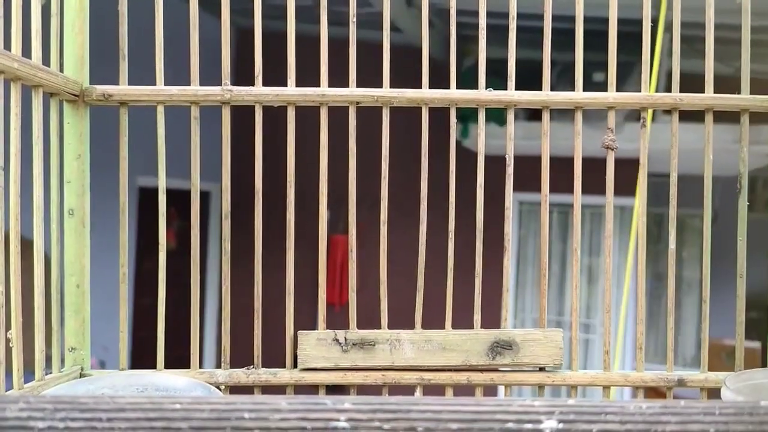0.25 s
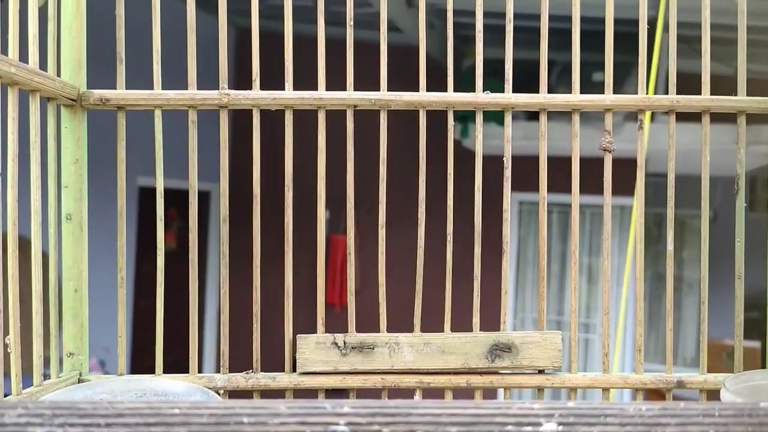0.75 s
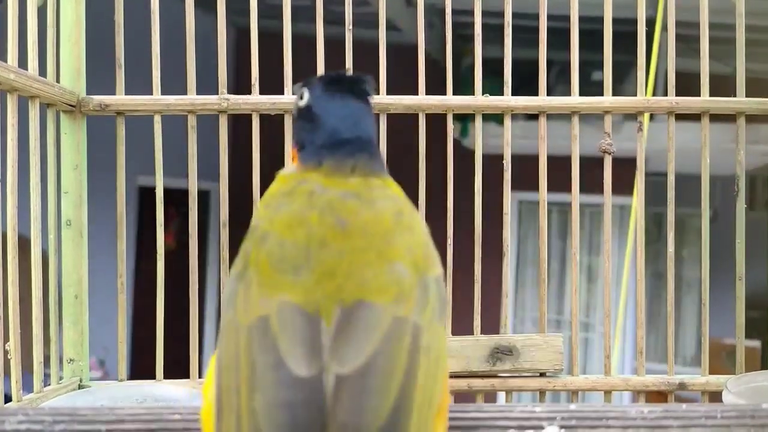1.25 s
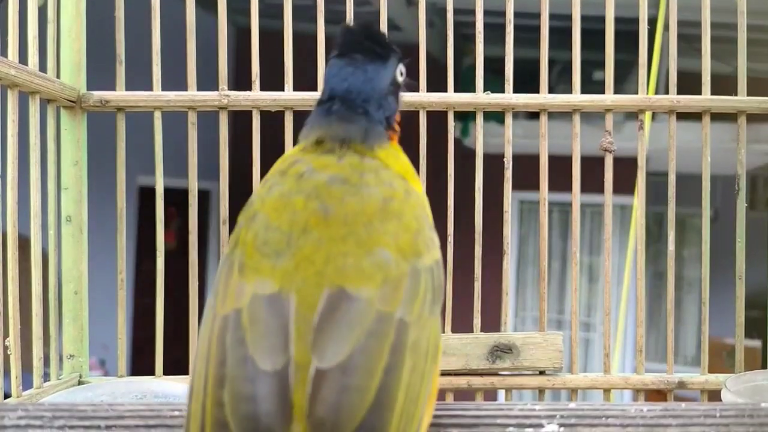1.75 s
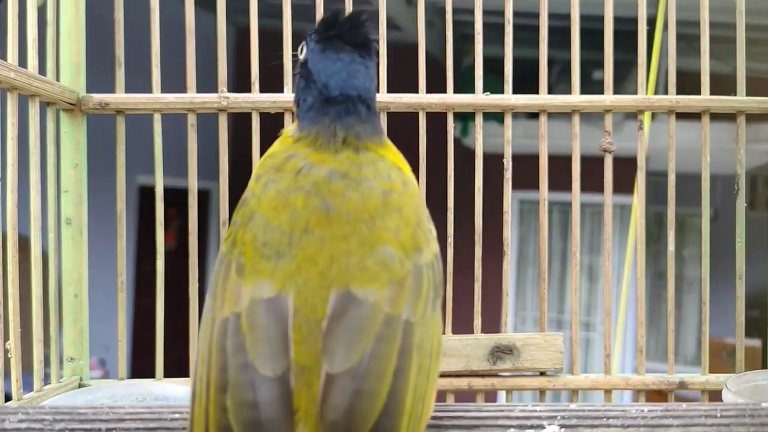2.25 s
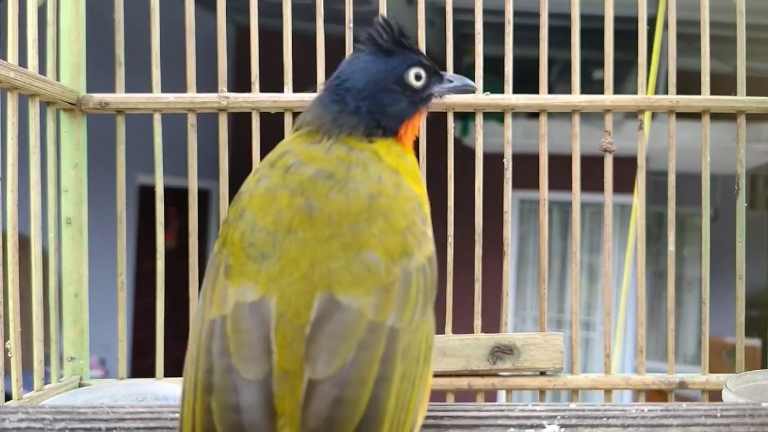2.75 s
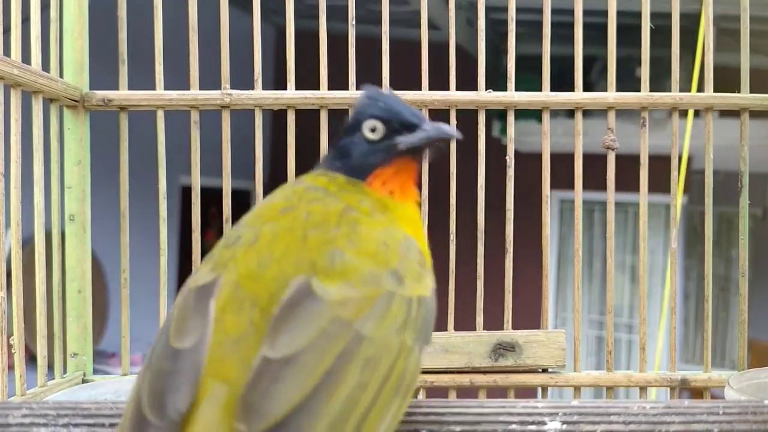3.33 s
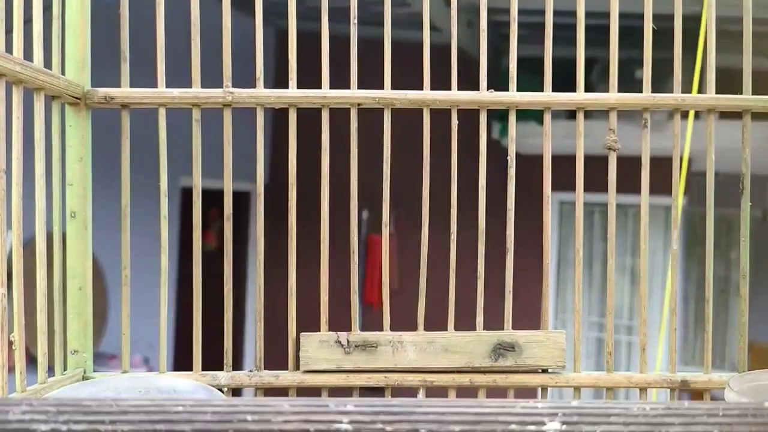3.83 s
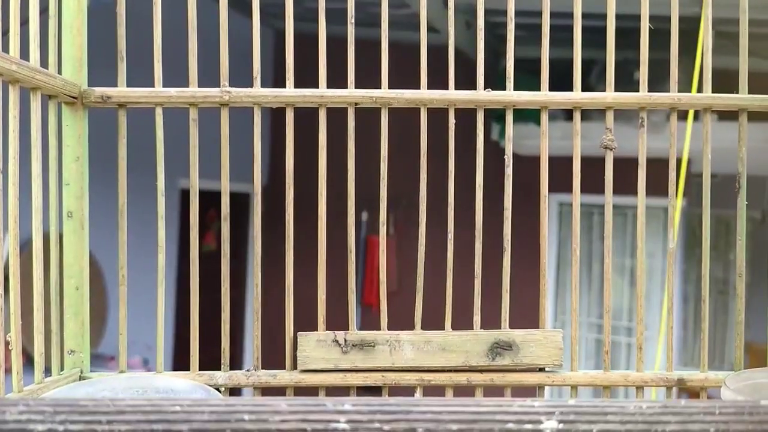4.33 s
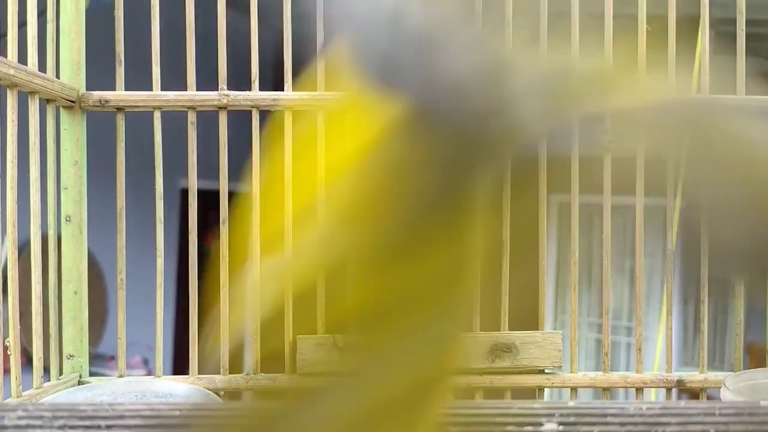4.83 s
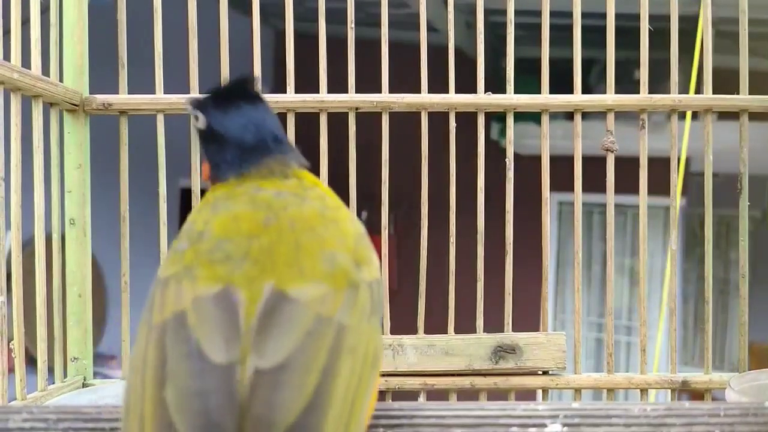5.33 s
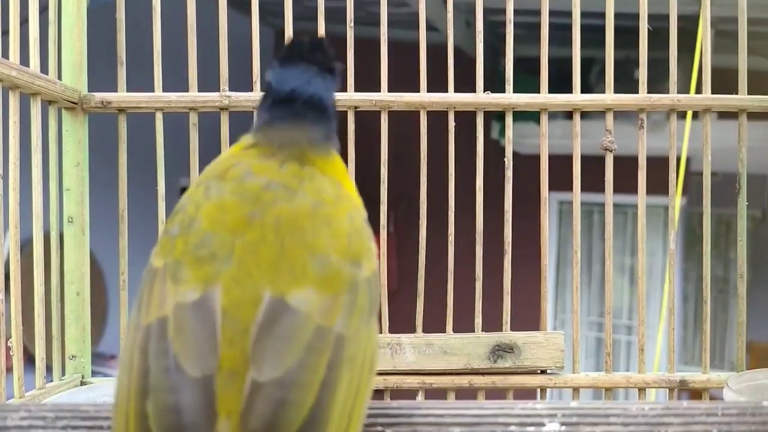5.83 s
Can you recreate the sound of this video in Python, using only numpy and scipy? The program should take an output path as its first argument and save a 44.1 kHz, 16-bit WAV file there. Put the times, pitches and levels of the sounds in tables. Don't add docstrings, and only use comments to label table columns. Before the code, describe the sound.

A phone-like stereo microphone rests on the cage base, so landings jolt low and blunt, mostly on the right, the heaviest overloading. The bird ticks on slats, whistles two quick upsweeps and a clear sustained note, hops away and back, then chatters a swift series of sharp, alternating soft and loud chirps. Behind are flickering, noise-gated yard murmur, house hum and an early far-off crow.

```python
import sys
import numpy as np
from scipy import signal
from scipy.io import wavfile
from scipy.ndimage import uniform_filter1d

SR = 44100
rng = np.random.default_rng(int(sys.argv[2]) if len(sys.argv) > 2 else 0)


def boost_factor(decibels):
    exponent = np.asarray(decibels, float) / 20
    return 10 ** exponent


def store_pcm(level_fs):
    pcm = np.round(np.clip(level_fs, -1, 1) * 32767).astype(np.int16)
    wavfile.write(sys.argv[1], SR, np.atleast_2d(pcm).T)


N = 268480
T = np.arange(N) / SR
YARD_LAG = 17

# time in seconds, gain in dB.
GATE = [(.12, -3.5), (.28, -3), (.68, -0.5), (.92, -11), (1.03, 0), (1.6, -4.5), (2.35, -2), (2.7, -14),
        (3.03, -23.5), (3.065, -12.5), (3.32, -6), (3.43, -29), (3.62, -24.5), (3.665, 1), (4.02, -3),
        (4.66, -34.5), (5.03, -0.5), (5.45, -7.5)]


def band(x, lo_hz, hi_hz, order=3):
    sos = signal.butter(order, [lo_hz, min(hi_hz, .45 * SR)], "band", fs=SR, output="sos")
    return signal.sosfilt(sos, x)


def unit(x):
    return x / np.sqrt(np.mean(x ** 2))


def walk(rate):
    hold = int(SR / rate)
    steps = np.repeat(rng.standard_normal(N // hold + 1), hold)
    return unit(uniform_filter1d(uniform_filter1d(steps, hold), hold)[:N])


def ring(hz, t60, length=.25):
    t = T[:int(length * SR)]
    return np.sin(2 * np.pi * hz * t) * np.exp(-np.log(1000) * t / t60)


def add(out, s, sound):
    i = int(s * SR)
    out[:, i:i + sound.shape[1]] += sound[:, :N - i]


def panned(pan_db):
    return np.array([[pan_db], [-pan_db]]) / 2


def bird():
    # time in seconds, pitch in Hz,
    # level in dB, left minus right in dB, left lag in samples.
    whistles = [
        [(1.6145, 1500, -36, -0.5, 7), (1.619, 2050, -17, -1, 7.7), (1.627, 2190, -7.5, -5, 7.5),
         (1.633, 2950, -6, 8, 6.9), (1.6375, 3380, -3, -6, 4.5), (1.645, 3690, -4.5, -4, 3.4),
         (1.6564, 3570, -3, -5, 3.9), (1.663, 3514, -6.5, -5, 5.5), (1.67, 3530, -25.5, -5.5, 6)],
        [(1.869, 1600, -33, -8, 10), (1.873, 2100, -13, -4, 10), (1.8805, 2170, -8, -8, 9.7),
         (1.8844, 2540, -9, -14, 5.8), (1.8879, 3220, 2.5, -1.2, 9.1), (1.8929, 3630, -1.5, -3, 6.2),
         (1.906, 3840, -3, -3.3, 7.8), (1.9184, 3765, -5.5, 4.5, 5.7), (1.9298, 3730, -23.5, 2, 5.5)],
        [(1.977, 3500, -23, -7.5, 6.4), (1.9915, 3388, -2, -10, 6), (2.0184, 3162, 3.5, -2.5, 8.3),
         (2.045, 3093, 4.5, 1, 7.8), (2.073, 3043, 4, -3.5, 7.25), (2.098, 3088, 4.5, 2.5, 7.9),
         (2.12, 3106, 5.5, -4.5, 7.7), (2.137, 3014, 5.5, 2, 7.1), (2.156, 3040, -6.5, 4.5, 6.8)],
    ]
    # time in seconds, pitch in Hz, level in dB, left minus right in dB, left lag in samples.
    flicks = [
        [(5.438, 2850, -31, -4, 1.1), (5.4415, 2675, -20, -12, 0.95), (5.4475, 2341, -10, -11, 7.6),
         (5.452, 1970, -19, 2, 5.9), (5.457, 1720, -15.5, 2, 1.8), (5.462, 1600, -28.5, 3, 3),
         (5.468, 1550, -16, -6, 1.9)],
        [(5.468, 1707, -27, 5, 2.8), (5.474, 2784, -5.5, -9, 0.67), (5.476, 3220, -6, 8.5, 6.2),
         (5.4795, 3348, 1.3, -3.5, 3.5), (5.4849, 2646, -22, -24, .7), (5.488, 2400, -21, -3, 2)],
        [(5.5, 2100, -13.5, -3.5, 2.3), (5.5025, 2495, -15, -8, 2.7), (5.5065, 3236, -1.5, 6, 5.9),
         (5.51, 3240, 1.26, -4, 2.6), (5.514, 3190, -1.5, -0.5, 5.9), (5.5185, 3150, -8.5, 2, 6.5),
         (5.523, 3120, -34, -3, 4.6)],
    ]
    # time in seconds, pitch in Hz, level in dB, left minus right in dB, left lag in samples.
    warbles = [
        [(5.562, 3400, -40, -8, 2.8), (5.5705, 3700, -21, -5, 2.7), (5.5859, 3972, -14, 1, 2.1),
         (5.598, 3990, -15, -4.5, 2.3), (5.604, 3883, -22.5, 0, 2), (5.609, 3505, -20, -3, 2.1)],
        [(5.648, 3490, -28.5, 1, 2.1), (5.6555, 3388, 2.4, -2.5, 3.4), (5.6639, 3264, 2.5, -2, 3.1),
         (5.678, 3050, -1.5, 11, 5), (5.6914, 3300, 2, -2, 3.4), (5.6975, 4145, -9, 3, 1.7),
         (5.7035, 4620, -1.5, -3, 2.3), (5.7153, 4890, -1, -0.5, 2), (5.7248, 5100, -21.5, -13, 0.96)],
        [(5.782, 3745, -38.5, -4, -3), (5.79, 3830, -21, 0, 1.8), (5.8, 4077, -15, 1, 2),
         (5.8124, 4126, -16, 2, 0.4), (5.8259, 4070, -33.5, -3.5, -0.5)],
        [(5.866, 3439, -23.5, -6, 5.1), (5.8755, 3399, -0.5, -11, 5), (5.9035, 3202, 2.5, -6, 8.5),
         (5.9095, 3280, -2, -12, 8), (5.9125, 3600, 0, -1, 4.2), (5.9175, 4365, -5, -1, 5.8),
         (5.9244, 4746, -1, -3, 6.15), (5.9328, 4884, -3.5, 1.5, 7.3), (5.9438, 5165, -19, -8, 7.9)],
    ]
    # half-pitch line in dB, 1.5 x line in dB, octave line in dB, rasp 0-1.
    voice = [(-33, -30, -39, 0.035), (-36, -31, -29, 0.03), (-38, -46.5, -46, 0.01), (-30, -40, -30, 0.06),
             (-22, -38, -42, 0.09), (-27.5, -40, -50, 0.08), (-27, -40, -22, 0.015),
             (-9, -19, -37.5, 0.055), (-23, -27, -28, 0.04), (-6, -23, -37, 0.05)]
    out = np.zeros((2, N))
    for note, (half_db, fifth_db, octave_db, rasp) in zip(whistles + flicks + warbles, voice):
        s, *columns = np.transpose(note)
        t = np.arange(s[0] - .002, s[-1] + .003, 1 / SR)
        smooth = max(60, len(t) // 24)
        hz, db, lean_db, lag = (uniform_filter1d(np.interp(t, s, c), size=smooth) for c in columns)
        phase = 2 * np.pi * (np.cumsum(hz) - hz * lag * np.array([[1], [0]])) / SR
        height = hz / hz.max()
        breath = unit(band(rng.standard_normal(len(t)), 100, 1400, order=2)) * (hz / 4500) ** 3
        tone = (1 + rasp * breath) * np.sin(phase + rasp * breath)
        odd = np.sin(3 * phase / 2) + 0.15 * np.sin(5 * phase / 2)
        halves = height ** 10 * (boost_factor(half_db) * np.sin(phase / 2) + boost_factor(fifth_db) * odd)
        overtones = boost_factor(octave_db) * height ** 7 * (np.sin(2 * phase) + .2 * np.sin(3 * phase))
        fade = np.clip(np.minimum(t - t[0], t[-1] - t) / .003, 0, 1)
        level = boost_factor(db + np.array([lean_db, -lean_db]) / 2)
        add(out, t[0], (tone + halves + overtones) * fade * level)
    return out


def bounces(x):
    # delay in seconds, left level in dB, right level in dB.
    surfaces = [
        (.0075, -24.5, -22.5),
        (.013, -28, -26.5),
        (.021, -27.5, -27),
    ]
    out = 0
    for s, left_db, right_db in surfaces:
        out = out + np.roll(x, int(s * SR), axis=1) * boost_factor(np.array([[left_db], [right_db]]))
    return out


def porch(x):
    # t60 in seconds, level in dB.
    tails = [
        (0.09, -16.5),
        (.4, -20),
        (.9, -35),
    ]
    t = T[:SR]
    onset = np.clip(t / 0.0027 - .3, 0, 1)
    out, x = [], band(x, 1700, 9500, order=2)
    for _ in range(2):
        tail = 0
        for t60, db in tails:
            fall = boost_factor(-60 * t / t60) * np.sqrt(14 / t60 / SR)
            tail = tail + boost_factor(db) * unit(rng.standard_normal(SR)) * fall
        out.append(signal.fftconvolve(x, tail * onset * np.cos(t * np.pi / 2))[:N])
    return np.array(out)


def cage():
    # start in seconds, peak in dB, pitch in Hz, decay in seconds.
    jolts = [(.001, 2.5, 150, 0.013), (0.011, -11, 100, 0.039), (.036, -14.5, 137, 0.052),
             (0.026, -9, 112, 0.032), (0.045, -12, 115, 0.026), (0.0518, -6, 106, 0.032),
             (0.326, -9.5, 70.2, 0.07), (0.34, -12.5, 90, 0.098), (.352, -6.5, 130, 0.018),
             (0.359, -6.5, 119, 0.026), (0.45, -21, 70, 0.079), (3.643, -30.5, 89, 0.065),
             (3.665, 7, 115.2, 0.036), (3.68, 8.5, 68.4, 0.025), (3.712, -19, 106, 0.066),
             (3.737, -20, 91.5, 0.029), (4.958, -25, 79.3, 0.13), (4.977, -4, 106, 0.031),
             (4.985, 24, 171, 0.017), (4.995, 5.5, 316.6, 0.019), (5.003, 2.5, 348.3, 0.022),
             (4.992, -3, 530, 0.022), (5.0, -12.5, 747, 0.019), (5.006, 9.5, 128, 0.017),
             (5.015, 16, 117, 0.014), (5.024, -8, 151, 0.024), (5.034, 4, 102, 0.017),
             (5.042, -5.5, 90, 0.031), (5.0562, 4.5, 112, 0.0256), (5.066, -13, 121, 0.031),
             (5.079, -17.5, 108, 0.089)]
    # start in seconds, peak in dB, pitch in Hz,
    # decay in seconds.
    thuds = [
        (4.956, -28, 66, 0.12),
        (5.032, -23, 190, 0.066),
        (5.044, -25, 130, 0.055),
    ]
    # start in seconds, peak in dB, left minus right in dB, woody part in dB.
    ticks = [(0.1104, -50, -9, -13), (0.18, -38, -1, -36), (0.2196, -35, -17, -40), (0.281, -20, -14.5, -1),
             (0.29, -36, -12, 12), (0.352, -10.5, -31, -40), (0.7716, -26.5, -16, -21),
             (0.997, -10, 3, -39), (1.0084, -18.5, -15, -24), (1.1187, -18, 2.5, -34),
             (3.0538, -41, -11, -7), (3.574, -36, 2.5, -27), (3.6313, -33, -18, -27),
             (3.6568, -37, -15, -2), (3.809, -22.5, -5, -41), (4.41, -36.5, -3, -20),
             (4.532, -43, -6, -8.5), (4.9483, -37, -11.5, -16), (4.983, -26.5, -37, 0.5),
             (5.029, -18, 1.5, -31), (5.1997, -24, 0.5, -22)]
    # pitch in Hz, level in dB, t60 in seconds.
    bamboo = [(925, 1, 0.06), (1122, 9.5, 0.097), (1377, 6.5, 0.048), (2056, -1, 0.0147), (2920, 2.5, 0.09)]
    # pitch in Hz, level in dB, t60 in seconds.
    port_hz, port_db, port_t60 = (8500, -3.5, 0.022)
    jolt_left_db = -50
    out = np.zeros((2, N))
    t = T[:SR // 4]
    for s, db, hz, t60 in jolts:
        sway = ring(hz, 1.27 * t60) * np.clip(t * hz * 2.12, 0, 1) ** 2
        swing = sway + 0.0307 * ring(3.5 * hz, 0.51 * t60)
        add(out, s, boost_factor(db) * 2.0 * swing * boost_factor(np.array([[jolt_left_db], [0]])))
    for s, db, hz, t60 in thuds:
        add(out, s, boost_factor(db) * ring(hz, t60) * np.ones((2, 1)))
    for s, db, pan_db, wood_db in ticks:
        grit = rng.standard_normal((2, SR // 4))
        crack = band(grit * boost_factor(-60 * t / 0.0092), 6000, 15000, order=3) * 0.3
        crack[1] += boost_factor(port_db) * ring(port_hz, port_t60) * 0.065
        wood = 0
        for k, (hz, mode_db, t60) in enumerate(bamboo):
            detune = 1 + 0.016 * grit[0, k]
            wood = wood + boost_factor(mode_db) * ring(hz * detune, t60) * 0.16
        add(out, s, boost_factor(db + panned(pan_db)) * (crack + boost_factor(wood_db) * wood))
    return out


def feathers():
    # start in seconds, end in seconds, level in dB, left minus right in dB.
    rustles = [(0.3, 0.485, -39, -5.5), (0.977, 1.013, -52.5, -15), (1.033, 1.16, -48.5, -1.5),
               (3.646, 3.739, -43, -4), (3.793, 3.838, -46, -13.5), (4.935, 5.047, -50.5, -10.5),
               (0.953, 1.037, -65, -18), (0.777, 0.995, -72.5, -15), (1.15, 1.26, -66, -2),
               (4.693, 4.778, -70, -7), (4.805, 4.911, -74, -10.5), (4.895, 4.961, -59.5, -5)]
    grains = band(rng.standard_normal((2, N)) * boost_factor(3.5 * walk(260)), 2236, 15000, order=1)
    out = 0
    for start, end, db, pan_db in rustles:
        swell = np.clip(np.minimum((T - start) / 0.0065, (end - T) / 0.034), 0, 1)
        out = out + swell * boost_factor(db + panned(pan_db))
    return out * unit(grains)


def lag_at(hz):
    return 3 if hz < 400 else YARD_LAG


def far():
    # start in seconds, end in seconds, pitch in Hz, level in dB.
    swells = [
        (.3, .46, 365, -54),
        (.46, .88, 385, -51),
        (.98, 1.22, 390, -48),
        (1.24, 1.47, 383, -48),
    ]
    # frequency in Hz, level in dB.
    throat = [(385, -11), (770, -4), (1150, 3), (1550, -7), (1950, -10), (2300, -18), (3100, -22)]
    # start in seconds, end in seconds, centre in Hz, width in Hz,
    # level in dB.
    house = [(3.45, 3.62, 228, 20, -59), (3.42, 3.55, 1045, 50, -71), (4.25, 4.42, 205, 40, -58),
             (4.48, 4.61, 200, 50, -55), (4.08, 4.34, 700, 90, -59), (5.1, 5.4, 330, 150, -53),
             (2.7, 2.95, 130, 80, -60), (3.42, 3.62, 110, 90, -72), (4.55, 4.97, 750, 110, -65),
             (5.5, 5.6, 370, 60, -46), (1.1, 1.2, 335, 60, -43), (2.1, 2.68, 150, 60, -49),
             (2.78, 2.93, 750, 300, -60), (2.72, 2.9, 340, 160, -60), (5.36, 5.48, 680, 120, -57),
             (3.85, 4.08, 520, 200, -56), (4.4, 4.47, 960, 60, -62), (4.52, 4.6, 700, 50, -63),
             (2.29, 2.5, 2400, 120, -62), (2.29, 2.45, 2120, 120, -62), (2.65, 2.88, 2620, 160, -78),
             (2.75, 2.84, 3030, 120, -75)]
    crow_left_db, hoarse_db = -4, 4.5
    crow, hums = np.zeros((2, N)), np.zeros((2, N))
    wobble = .012 * walk(80) + .014 * walk(9)
    throat_hz, throat_db = np.transpose(throat)
    waver = [boost_factor(hoarse_db * np.array([walk(90), walk(90)])) for _ in range(9)]
    for start, end, hz, db in swells:
        phase = 2 * np.pi * np.cumsum(hz * (1 + wobble)) / SR
        stack = 0
        for k in range(1, 9):
            stack = stack + boost_factor(np.interp(k * hz, throat_hz, throat_db)) * waver[k] * np.sin(k * phase)
        arch = abs(np.sin(np.pi * np.clip((T - start) / (end - start), 0, 1))) ** .6
        crow += stack * boost_factor(db) * arch
    for start, end, hz, width, db in house:
        swell = np.clip(np.minimum(T - start, end - T) / .03, 0, 1)
        noise = band(rng.standard_normal(N), hz - width / 2, hz + width / 2, order=2)
        hum = boost_factor(db) * swell * unit(noise)
        hums += [np.roll(hum, lag_at(hz)), hum]
    return hums + [boost_factor(crow_left_db) * np.roll(crow[0], YARD_LAG), crow[1]]


def activity():
    # murmur in dB, share of the gate, decay of a stir as a share of its t60.
    murmur = [
        (-45, 1.28, 0.63),
        (-53, 1.015, 0.75),
        (-60, 1.07, 0.62),
        (-69, 1.053, 0.5),
    ]
    # start in seconds, level in dB, t60 in seconds, rumble in dB and
    # hiss in dB, both relative.
    stirs = [(.001, -40.5, 0.28, 13.5, -4), (.185, -60, 3.1, 12, 5), (0.285, -28, 0.36, -5.5, -9.5),
             (0.331, -37, 1.9, -4, -9), (0.997, -45.5, 0.18, -16, 11.5), (1.033, -44, 1.8, -5, -16.5),
             (1.118, -35.5, 0.32, 7.5, -7.5), (1.7, -44, 1.4, -25, -15), (1.849, -43, 7.3, -33, -28),
             (2.3, -45, 3, -17.5, -44), (3.061, -22.5, 1.09, -23, -5.5), (3.075, -36, 1.6, -5, -30),
             (3.578, -43, 0.068, -12, 9), (3.633, -47, 0.1, 3, 11), (3.663, -50.5, 3, -13, -0.5),
             (3.803, -38.5, 0.61, -1.5, -5), (4.044, -49, 6.9, -5, -2), (4.24, -33.5, 0.81, -6, -10.5),
             (4.41, -27, 0.56, -2, -1), (4.533, -30.5, 0.61, 11.5, -4.5), (4.949, -43.5, 1.16, -5, -0.5),
             (5.031, -34, 0.17, -4, -3), (5.199, -58, 0.71, 21, 3), (5.446, -40, 7.4, -29, -4.5),
             (.111, -61, 0.356, 21, -14), (1.248, -42, 4.1, -6, -33), (1.43, -53.5, 3.6, 10, -50.5),
             (.5, -57.5, 1.5, 10, -2.5)]
    rise_s, scrape_db = 0.0043, -3.5
    t = T[::64]
    s, db, t60, rumble_db, hiss_db = np.transpose(stirs)[:, :, None]
    gate_db, levels = np.interp(t, *np.transpose(GATE)), []
    for tint_db, (murmur_db, share, pace) in zip((rumble_db, 0, scrape_db, hiss_db), murmur):
        fall_db = np.where(t < s, 30 * (t - s) / rise_s, -60 * (t - s) / (pace * abs(t60)))
        power = boost_factor(murmur_db) ** 2 + (boost_factor(db + tint_db + fall_db) ** 2).sum(axis=0)
        levels.append(np.interp(T, t, np.sqrt(power) * boost_factor(share * gate_db)))
    return levels


def yard():
    # low edge in Hz, high edge in Hz, right minus left in dB, likeness of the ports 0-1,
    # slope in dB per octave.
    layers = [
        (44, 294, 1, 0.79, 0),
        (303, 1350, 1.5, 0.74, -1.5),
        (1450, 3540, 0, 0.1, -8),
        (3600, 17000, -1, 0.4, -4),
    ]
    flicker_db = 2.6
    out = 0
    for level, (lo_hz, hi_hz, right_db, like, slope_db) in zip(activity(), layers):
        edges = np.geomspace(lo_hz, hi_hz, num=6)
        like, layer = np.clip(like, 0, 1), 0
        for a, b in zip(edges, edges[1:]):
            same, left, right = (unit(band(rng.standard_normal(N), a, b, order=2)) for _ in range(3))
            shared = np.array([np.roll(same, lag_at(a)), same])
            pair = np.sqrt(like) * shared + np.sqrt(1 - like) * np.array([left, right])
            tilt_db = slope_db * np.log2(a / lo_hz) - 14.0 * max(np.log2(b / 10000), 0)
            layer = layer + pair * np.sqrt(b - a) * boost_factor(tilt_db + flicker_db * walk(12))
        out = out + unit(layer) * level * boost_factor(np.array([[0], [right_db]]))
    return out


def suppress(x):
    contrast = 1.3
    z = signal.stft(x, SR, nperseg=1024)[2]
    power = abs(z) ** 2 + 1e-20
    z = z * np.minimum(power / uniform_filter1d(power, size=12, axis=1), 2) ** (contrast / 2)
    return signal.istft(z, SR)[1][:, :N]


def starve(x):
    dropped, drop_hz, faint_db = .23, 2400, -55
    thin_hz, top_hz = 4500, 15650
    hz, _, z = signal.stft(x, SR, nperseg=1024)
    strip = (26 * np.log(hz / 2000 + 1)).astype(int)
    luck = rng.standard_normal((3, strip[-1] + 1, z.shape[2]))
    luck = uniform_filter1d(luck[2] + .3 * luck[:2], size=7, axis=2)[:, strip]
    size = uniform_filter1d(abs(z), size=9, axis=1) + 1e-9
    prominence = np.log(size / uniform_filter1d(size, size=120, axis=1))
    thin = .45 * np.exp(-((hz - thin_hz) / 1500) ** 2) + np.clip(hz / 9000 - 1, 0, 1)
    luck = luck + .3 * prominence - thin[:, None]
    unlucky = luck < np.quantile(luck[:, hz < top_hz], dropped)
    poor = unlucky & (hz > drop_hz)[:, None] | (hz > top_hz)[:, None]
    return signal.istft(np.where(poor & (size < boost_factor(faint_db)), 0, z), SR)[1][:, :N]


def scene():
    tail_flutter_db, tail_gate = 1.2, .2
    song = bird()
    echoes = porch(song.mean(axis=0) / 2 + song[1] / 2)
    echoes = echoes * boost_factor(tail_flutter_db * np.array([walk(60), walk(60)]))
    echoes = echoes * boost_factor(tail_gate * np.interp(T, *np.transpose(GATE)))
    hiss = boost_factor(-86.5) * rng.standard_normal((2, N))
    faint = yard() + far() + echoes + hiss
    return song + bounces(song) + cage() + feathers() + suppress(faint)


def roll_off(x):
    return signal.sosfilt(signal.butter(12, 16470, fs=SR, output="sos"), x)


def record(dry):
    # centre in Hz, width in Hz, lift in dB.
    ports = [
        (6660, 470, 8.8),
        (8620, 1100, 11.1),
    ]
    # low edge in Hz, high edge in Hz, share removed 0-1.
    lo_hz, hi_hz, removed = (15000, 19000, 0.77)
    lifted = []
    for x, (hz, width, db) in zip(dry, ports):
        lifted.append(x + (boost_factor(db) - 1) * band(x, hz - width / 2, hz + width / 2, order=1))
    clipped = np.clip(lifted, -1, 1)
    sos = signal.butter(2, (lo_hz, hi_hz), "band", fs=SR, output="sos")
    mix = starve(clipped - removed * signal.sosfiltfilt(sos, clipped))
    return roll_off(mix)


dry = scene()
out = record(dry)
store_pcm(out)
```